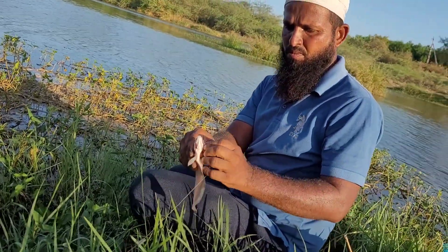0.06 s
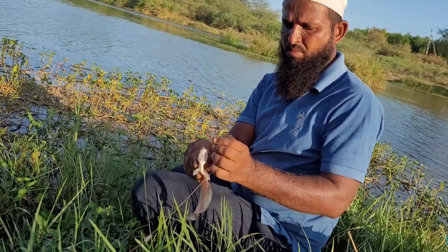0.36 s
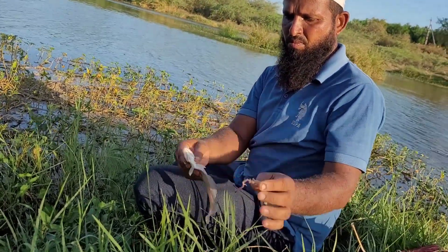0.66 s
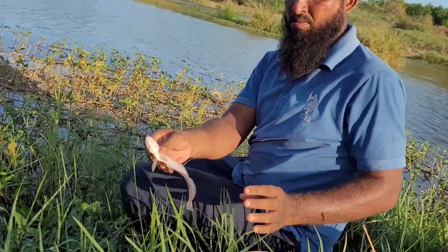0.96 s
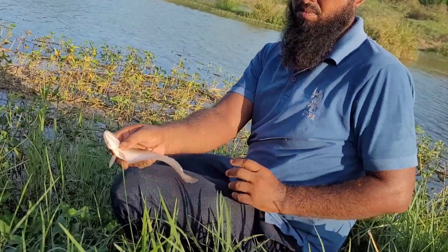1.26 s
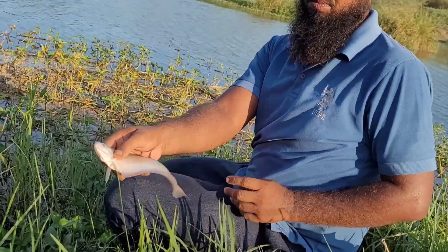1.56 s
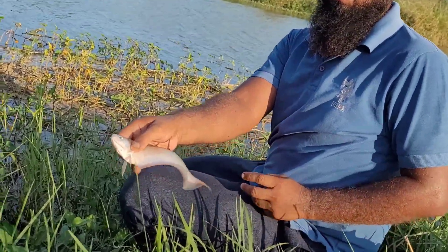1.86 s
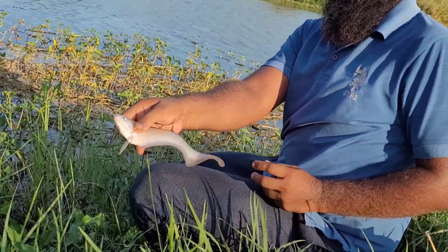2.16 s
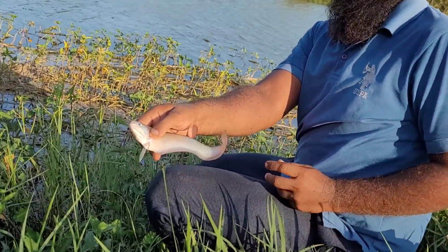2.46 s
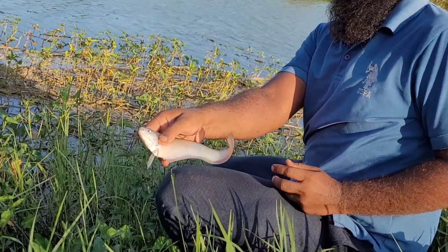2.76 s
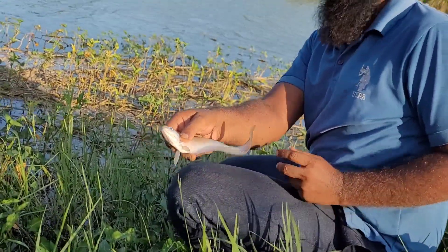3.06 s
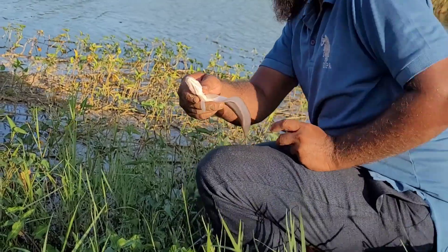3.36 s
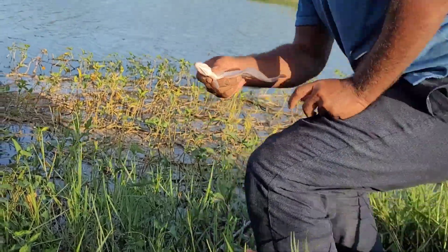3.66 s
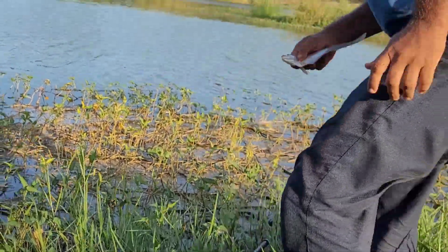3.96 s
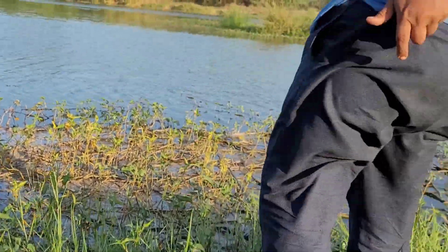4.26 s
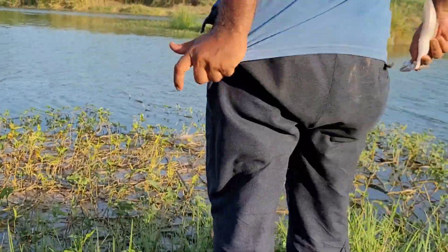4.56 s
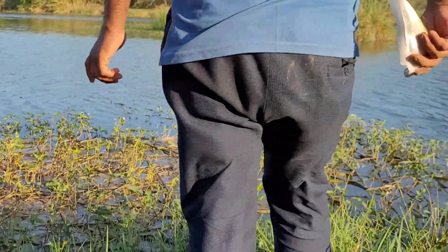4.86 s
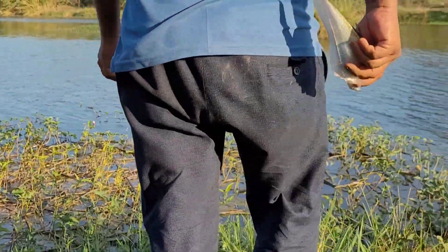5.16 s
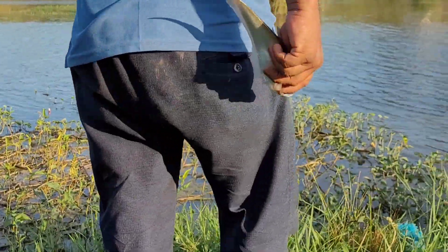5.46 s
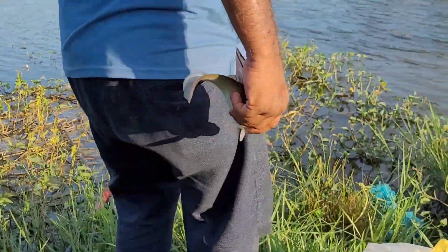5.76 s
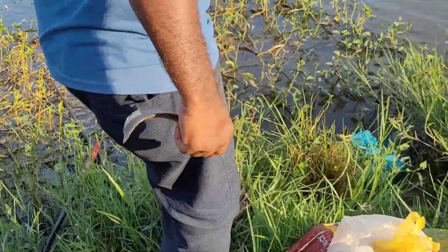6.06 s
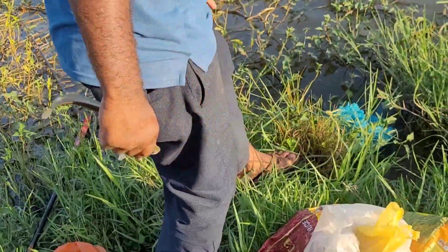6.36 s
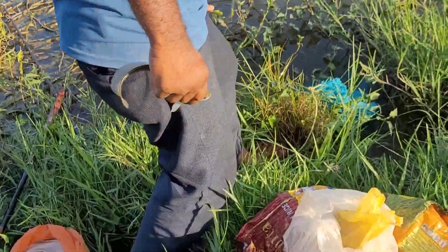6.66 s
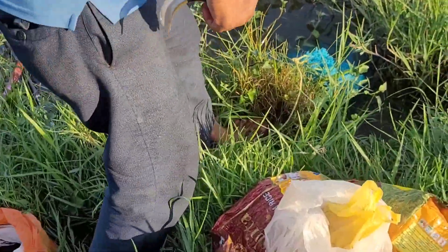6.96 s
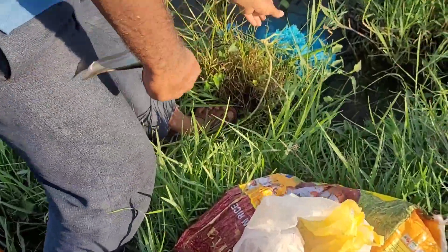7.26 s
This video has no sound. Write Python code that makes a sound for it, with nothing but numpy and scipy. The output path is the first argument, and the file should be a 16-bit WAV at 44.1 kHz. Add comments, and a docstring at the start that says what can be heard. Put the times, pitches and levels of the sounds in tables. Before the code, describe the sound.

By a quiet pond, a cricket, small birds and a repeated wavy whistle give way to grassy footsteps, snapping stems and wind on the microphone.

```python
"""A quiet pond bank, on a hand-held stereo microphone. From the start a bush cricket chirps further off,
thin ticks sound close by, and fingers bump and rub the right port. Small birds join in, off to the right.
Near 2 s and 3.5 s a bird whistles one wavy note that echoes off the banks. As it whistles a third time,
just before 6 s, someone gets up and wades through long grass, stems snapping underfoot,
while a breeze buffets the microphone."""
import sys
import numpy as np
from scipy import signal
from scipy.fft import rfft, irfft, next_fast_len
from scipy.io import wavfile
from scipy.ndimage import uniform_filter1d

SR = 44100
rng = np.random.default_rng(int(sys.argv[2]) if len(sys.argv) > 2 else 0)


def transcribe(u):
    """Save the signal u as a 16-bit wav file named by the first command-line argument.

    u: samples, shape (n,) or (channels, n), limited to [-1, 1]; the rate is SR.
    q: integer samples, one column per channel.
    """
    v = np.clip(np.atleast_2d(u).T, -1, 1)
    q = np.round(v * 32767).astype(np.int16)
    wavfile.write(sys.argv[1], SR, q)


N = 322665
TIME = np.arange(N) / SR
CUTOFF_HZ = 15850


def from_db(db):
    """Decibels to gain."""
    return 10 ** (np.asarray(db) / 20)


def rms_one(x):
    """Scale to rms 1."""
    return x / np.sqrt(np.mean(x ** 2) + 1e-20)


def in_time(rows):
    """The columns of a curve at every sample."""
    s, *columns = np.transpose(rows)
    return [np.interp(TIME, s, c) for c in columns]


def butter(x, hz, kind, order=2):
    """Butterworth filter."""
    sos = signal.butter(order, np.clip(hz, 10, .45 * SR), kind, fs=SR, output="sos")
    return signal.sosfilt(sos, x + 1e-18)


def pan(db):
    """Gains that put the left channel db above the right."""
    return from_db(np.array([[db], [-db]]) / 2)


def drift(rate_hz):
    """A smooth random wander with spread 1."""
    step, settle = 40, 2000
    pole = np.exp(-2 * np.pi * step * rate_hz / SR)
    kicks = rng.standard_normal(N // step + settle + 2)
    slow = signal.lfilter([1], [1, -2 * pole, pole * pole], kicks)[settle:]
    return np.interp(np.arange(N) / step, np.arange(len(slow)), rms_one(slow))


def colour(x, spectrum):
    """Give a steady sound a spectrum that falls away beyond its ends; rms 1."""
    size = next_fast_len(N)
    hz = np.maximum(np.arange(size // 2 + 1) * SR / size, 1)
    points, db = np.transpose(spectrum)
    skirts = np.minimum(1, np.minimum(hz / points[0], points[-1] / hz)) ** 4
    gain = from_db(np.interp(np.log(hz), np.log(points), db)) * skirts * (hz < CUTOFF_HZ)
    return rms_one(irfft(rfft(x, size) * gain, size)[..., :N])


def noise():
    """White noise, unrelated in the two channels."""
    return rng.standard_normal((2, N))


def grains(per_s, spread_db):
    """Random tiny contacts of uneven size; rms 1."""
    sizes = from_db(spread_db * np.minimum(rng.exponential(1, N), 4)) * rng.choice([-1, 1], N)
    return rms_one(sizes * (rng.random(N) < per_s / SR))


def friction(per_s, spread_db, hiss):
    """Blades catching on each other over an even hiss, in both channels."""
    return np.array([grains(per_s, spread_db) for channel in range(2)]) + hiss * noise()


def slur(length, start_hz, middle_hz, end_hz):
    """One thin note that bends through three pitches."""
    u = np.linspace(0, 1, int(length * SR))
    hz = np.polyval(np.polyfit([0, .5, 1], [start_hz, middle_hz, end_hz], 2), u)
    return np.sqrt(np.abs(np.sin(np.pi * u))) * np.sin(2 * np.pi * np.cumsum(hz) / SR)


def ring(t, hz, t60):
    """A struck mode dying away."""
    return np.sin(2 * np.pi * hz * t) * from_db(-60 * t / t60)


def swell(s, attack, fade):
    """A stroke gathers force over its attack, then loses 20 dB in each fade time."""
    rise = np.clip((TIME - s) / attack, 0, 1) ** 2
    return rise * from_db(-20 * np.clip((TIME - s - attack) / fade, 0, 10))


def gate(start, end):
    """1 from start to end, with soft edges."""
    return uniform_filter1d(1. * ((TIME >= start) & (TIME <= end)), size=300)


def add(out, s, sound):
    """Mix a short sound in at time s."""
    i = max(0, int(s * SR))
    out[..., i:i + sound.shape[-1]] += sound[..., :N - i]


# The far background at each port, and the high sizzle over it.
# Each row: frequency in Hz, relative density in dB.
AIR_LEFT = [(120, 6), (300, 2), (600, -6.5), (1200, -10.5), (2200, -9), (3200, -11), (5000, -26),
            (7000, -10.5), (10500, 0.5), (12000, -9), (15000, 0)]
AIR_RIGHT = [(120, -5.5), (300, 4), (600, -4), (1200, -10.5), (2200, -9), (3100, 4.5), (4400, 5),
             (5500, -5), (7500, -13.5), (9500, -4.5), (10800, 3.5), (12000, -5.5), (15000, -3.5)]
SIZZLE_COLOUR = [(8000, -62), (11000, -10.5), (13000, -12.5), (15000, -3), (15800, -8)]
# The sizzle's rise and fall. Each row: time in seconds, level in dB.
SIZZLE_LEVEL = [(0, -92), (.4, -91), (.6, -72), (1.0, -79), (2.1, -72.5), (3.05, -68.5), (3.15, -74),
                (4.0, -75.5), (5.05, -67), (5.9, -69)]


def air():
    """Distant chorus and steady hiss, with a swelling sizzle on top."""
    left, right = noise()
    steady = np.array([from_db(-72.5) * colour(left, AIR_LEFT), from_db(-68) * colour(right, AIR_RIGHT)])
    sizzle_db, = in_time(SIZZLE_LEVEL)
    return steady + from_db(sizzle_db + 1.7 * drift(25)) * colour(noise(), SIZZLE_COLOUR) * pan(-2)


# A bush cricket further off, near the centre.
# Each row: start and end in seconds, pitch in Hz, relative level in dB.
CRICKET_BOUTS = [(.15, 0.847, 9030, -76), (0.854, 1.585, 9170, -68.5), (1.58, 2.74, 8450, -79),
                 (2.747, 4.402, 8740, -76.5), (4.4, 5.453, 9220, -69.5)]


def cricket():
    """About ten chirps a second, each a run of wing strokes on a narrow resonance."""
    hz, = in_time([(s, pitch) for start, end, pitch, _ in CRICKET_BOUTS for s in (start, end)])
    level = sum(from_db(db) * gate(start, end) for start, end, _, db in CRICKET_BOUTS)
    chirps = np.clip(1.1 + 1.4 * np.cos(2 * np.pi * 10.4 * (TIME - 1.25)), 0, 1)
    strokes_per_s = 105 * (1 + 0.066 * drift(6.1))
    stroke = np.cumsum(strokes_per_s) / SR % 1
    sweep_hz = 900 * (.5 - stroke) + 220 * drift(400)   # the pitch falls within each stroke
    wing = np.sin(np.pi * stroke) ** 2 * np.sin(2 * np.pi * np.cumsum(hz + sweep_hz) / SR)
    return level * from_db(-10) * rms_one(chirps * wing) * pan(-0.93)


# Echoes off the pond's banks. Each row: delay in seconds, level in dB against the direct sound.
BANK_ECHOES = [(0.032, -21.5), (.057, -16), (0.132, -25)]


def banks(x, scatter_db, t60):
    """A few echoes and a faint scatter from the reeds, different at each port."""
    t = TIME[:SR // 2]
    scatter = rng.standard_normal((2, len(t))) * from_db(-60 * t / t60)
    response = from_db(scatter_db) * rms_one(scatter) / np.sqrt(len(t))
    for delay, db in BANK_ECHOES:
        for side in response:
            add(side, delay + rng.uniform(0, 0.0038), from_db([db]))
    return signal.fftconvolve(x[None], response, axes=1)[:, :N]


# Small birds further off, well to the right: first their rising slurs.
# Each row: start and length in seconds, starting pitch in Hz, relative level in dB.
RISING_SLURS = [(1.05, 0.21, 3070, -72.5), (1.58, 0.13, 4160, -72), (1.98, 0.17, 3080, -71),
                (2.541, .1, 4290, -74), (3.413, 0.072, 4360, -70.5), (4.403, .082, 4570, -77),
                (6.04, 0.13, 3360, -63.5)]
# High falling slurs. Each row: start and length in seconds, middle and end in Hz, relative level in dB.
FALLING_SLURS = [(2.565, 0.27, 6980, 5200, -69), (3.473, 0.18, 6050, 5070, -76),
                 (3.718, 0.073, 6800, 6300, -74), (5.16, 0.18, 6300, 4850, -69)]
# Short pips. Each row: start in seconds, first and last pitch in Hz, relative level in dB.
PIPS = [(1.62, 4000, 2900, -66), (2.054, 4560, 4450, -68), (2.109, 5200, 4140, -67),
        (2.311, 3690, 3750, -68), (2.352, 4500, 4320, -68), (2.406, 4900, 3670, -68),
        (5.439, 4300, 5300, -65)]


def small_birds():
    """Slurs and pips over a far twitter; the long path to the microphone makes them waver."""
    rise_hz_per_s, fall_start_hz, pip_s = 9100, 7630, .023
    song = np.zeros(N)
    for s, length, hz, db in RISING_SLURS:
        add(song, s, from_db(db) * slur(length, *np.linspace(hz, hz + rise_hz_per_s * length, 3)))
    for s, length, middle_hz, end_hz, db in FALLING_SLURS:
        add(song, s, from_db(db) * slur(length, fall_start_hz, middle_hz, end_hz))
    for s, start_hz, end_hz, db in PIPS:
        add(song, s, from_db(db) * slur(pip_s, start_hz, (start_hz + end_hz) / 2, end_hz))
    for when, span, pitch, bend, loud in rng.random((70, 5)):
        hz, glide = 3100 + 1500 * pitch, 900 * (bend - .5)
        twitter = slur(0.0048 + 0.042 * span, hz - glide, hz, hz + glide)
        add(song, when * N / SR, from_db(-84 + 10 * loud) * twitter)
    waver_s, waver_db = 3.5e-5 * drift(70), 4.5 * drift(60)
    song = np.interp(TIME + waver_s, TIME, song) * from_db(waver_db)
    return from_db(-5.5) * (song + banks(song, scatter_db=-8.5, t60=0.46)) * pan(-19)


# Thin dry ticks close by on the right.
# Each row: time in seconds, relative levels of the tick and of its sizzle in dB.
TICKS = [(.216, -51, -74), (1.279, -53, -73.5), (1.517, -48.5, -77), (1.996, -48.5, -66.5),
         (2.423, -45, -67.5), (2.883, -46.5, -66.5), (3.546, -48, -67), (3.948, -50.5, -66.5),
         (4.322, -52, -67), (4.634, -53, -75), (4.872, -49, -77)]


def ticks():
    """A fine sizzle builds and ends in a tiny, very bright tick."""
    lead_s, rise_s = 0.29, 0.15
    out, lead_in, t = np.zeros((2, N)), np.zeros(N), TIME[:SR // 25]
    burst = (1 - np.exp(-t / .0012)) * np.exp(-t / .005)
    for s, db, sizzle_db in TICKS:
        add(out, s, from_db(db) * rng.standard_normal((2, len(t))) * burst / burst.max())
        lead_in += from_db(sizzle_db) * np.clip((TIME - s + lead_s) / rise_s, 0, 1) * (TIME < s)
    sizzle = lead_in * colour(noise(), SIZZLE_COLOUR)
    return butter(out, 12400, "high", order=4) * pan(-10.5) + sizzle * pan(-5.5)


# The breeze, right on the ports. Each row: time in seconds, relative level in dB.
GUSTS = [(5.6, -72.5), (5.82, -50.5), (6.0, -46), (6.12, -50.5), (6.22, -43.5), (6.5, -38), (6.58, -49.5),
         (6.87, -52), (6.93, -43.5), (7.32, -44)]
# Its low buffeting. Each row: frequency in Hz, relative density in dB.
BUFFET_COLOUR = [(30, -16.5), (45, 0), (62, 2.5), (85, -1), (110, -5.5), (150, -13), (190, -25), (260, -23),
                 (380, -38.5), (520, -45)]


def breeze():
    """Gusts make turbulence, separate at each port."""
    gust_db, = in_time(GUSTS)
    eddies = colour(noise(), BUFFET_COLOUR)
    # Even out the eddies so that the gust sets their force.
    eddies /= np.sqrt(uniform_filter1d(np.mean(eddies ** 2, axis=0), size=SR // 12))
    flutter_db = 3.14 * drift(17)
    return from_db(gust_db + 5 + flutter_db) * gate(GUSTS[0][0], N / SR) * eddies * pan(2.3)


# Fingers bumping the right port.
# Each row: time in seconds, thud peak in dB, contact in seconds, grit in dB against the thud.
BUMPS = [(0.538, -47.5, 0.0028, -27), (0.574, -48, 0.0032, -25), (.649, -47, 0.0016, 7.5),
         (1.127, -39.5, 0.0043, -20), (1.23, -37, 0.0032, -12), (1.576, -35, 0.0055, -3.5),
         (1.691, -40.5, 0.00091, 3), (1.692, -26, 0.0029, -20), (3.661, -28.5, 0.00081, -26),
         (3.6654, -26.5, 0.00072, 9), (3.668, -20.5, 0.0016, -2), (3.67, -23, 0.0019, -19),
         (3.982, -51, 0.0015, -1), (4.19, -53.5, 0.002, -22)]
# A finger sliding over that port.
# Each row: start in seconds, level in dB, attack and fade in seconds, slips a second, sharpness 0-1.
RUBS = [(0.131, -48, 0.12, 0.11, 3500, 0.21), (3.616, -31.5, 0.044, 0.026, 1300, 0.51)]


def fingers():
    """Bumps push a pressure pulse into the port, which leaks away; sliding adds stick-slip crackle."""
    out, t = np.zeros(N), TIME[:SR // 8]
    for s, db, contact, grit_db in BUMPS:
        push = np.sin(np.pi * np.minimum(t / contact, 1)) ** 2
        thud = butter(push, 83, "high", order=3)
        grit = butter(rng.standard_normal(len(t)) * np.exp(-t / 0.0037), 1420, "low", order=1)
        add(out, s, from_db(db) * (thud / np.max(np.abs(thud)) + from_db(grit_db) * grit))
    for s, db, attack, fade, per_s, sharpness in RUBS:
        slips = grains(per_s, spread_db=-0.5) + 0.16 * rng.standard_normal(N)
        dull, sharp = rms_one(butter(slips, 940, "low")), rms_one(butter(slips, 6100, "low", order=1))
        rub = butter((1 - sharpness) * dull + sharpness * sharp, 93, "high")
        out += from_db(db) * swell(s, attack, fade) * rub
    return out * from_db([[-32], [0]])


# Soft rumble of the microphone in the hand. Each row: time in seconds, relative level in dB.
RUMBLE_LEVEL = [(0, -70.5), (.33, -52.5), (.45, -62.5), (.82, -58.5), (1.08, -64.5), (1.85, -62.5),
                (2.35, -69.5), (2.59, -62), (2.8, -70.5), (3.75, -67.5), (4.55, -75), (5.6, -68.5)]
# Its spectrum. Each row: frequency in Hz, relative density in dB.
RUMBLE_COLOUR = [(30, -26), (40, 5), (48, 7), (62, -1), (90, -4.5), (125, -6), (170, -18), (260, -18)]


def handling_rumble():
    """The held microphone rumbles throughout, stirred by every finger bump."""
    rumble_db, = in_time(RUMBLE_LEVEL)
    held = from_db(rumble_db + 2.5 + 1.6 * drift(8)) * pan(-7)
    trembles = [from_db(db - 27.5) * swell(s, contact, fade=0.073) for s, db, contact, _ in BUMPS]
    return (held + np.max(trembles, axis=0) * pan(-23)) * colour(noise(), RUMBLE_COLOUR)


# Cloth on the grass as the body shifts and rises. Each row: time in seconds, level in dB.
BRUSH_LEVEL = [(0, -83), (.45, -81), (.58, -68.5), (.89, -70), (1.0, -86.5), (3.9, -80.5), (4.12, -70.5),
               (5.05, -69.5), (5.8, -64.5), (6.0, -69.5)]
# Spectra of the cloth and of an arm's sweep. Each row: frequency in Hz, relative density in dB.
BRUSH_COLOUR = [(500, -3), (1900, -7.5), (2500, -4), (3000, 2.5), (4200, 0), (6500, -1.5), (10000, -3.5),
                (15000, 2.5)]
SWEEP_COLOUR = [(1700, -21), (2200, -10), (2700, 5), (3150, 6), (4000, -0.5), (5200, -2), (7000, -10.5),
                (11000, -2), (15000, -1)]


def brushing():
    """Right of centre, cloth drags over the blades and an arm sweeps through them once."""
    brush_db, = in_time(BRUSH_LEVEL)
    cloth = colour(friction(2500, spread_db=4.5, hiss=0.97), BRUSH_COLOUR)
    cloth *= from_db(brush_db + 3.4 * drift(20))
    arm = colour(friction(3000, spread_db=6, hiss=0.79), SWEEP_COLOUR)
    arm *= from_db(-51.5) * swell(0.741, attack=0.067, fade=0.1)
    return cloth * pan(-3.5) + arm * pan(-7)


# Strides through the long grass, near the centre.
# Each row: start in seconds, relative levels of swish and crush in dB, fade in seconds.
STRIDES = [(5.916, -59.5, -66, 0.39), (6.13, -59, -62.5, 0.54), (6.27, -60.5, -72.5, 1.3),
           (6.478, -58, -49.5, 0.19), (6.589, -52, -52, 0.31), (6.68, -50.5, -53.5, 0.27),
           (6.88, -59, -60.5, 0.87)]
# Spectra of the swish and the crush. Each row: frequency in Hz, relative density in dB.
SWISH_COLOUR = [(1500, -5.5), (2400, -13), (2900, 1), (3500, 0.5), (5000, 2), (7000, -2.5), (9000, -5),
                (12500, 1.5), (15500, 1.5)]
CRUSH_COLOUR = [(250, -1.5), (450, -3), (600, -3.5), (800, -3), (1080, -2.5), (1350, -3), (1780, -1),
                (2050, -5.5), (2500, -3), (2850, 0), (3300, -16.5), (6000, -11.5), (12000, -37)]


def wading():
    """Legs swish through the blades and feet crush them; overlapping strides add in power."""
    swish_power, crush_power = np.zeros((2, N))
    for s, swish_db, crush_db, fade in STRIDES:
        stride = swell(s, attack=0.087, fade=fade)
        swish_power += (from_db(swish_db) * stride) ** 2
        crush_power += (from_db(crush_db) * stride) ** 2
    swish = colour(friction(5000, spread_db=3.5, hiss=0.88), SWISH_COLOUR)
    swish *= np.sqrt(swish_power) * from_db(6.5 + 1.7 * drift(17))
    crush = colour(friction(2000, spread_db=5, hiss=1), CRUSH_COLOUR)
    crush *= np.sqrt(crush_power) * from_db(2 + 2 * drift(40))
    return swish * pan(0.12) + crush * pan(-1.5)


# Stems snapping on both sides of the microphone. Each row: time in seconds, peak in dB,
# the stem's own pitch in Hz, shared modes in dB against that pitch, left over right in dB.
SNAPS = [(.139, -54.5, 2070, -28, -3), (.554, -40.5, 3940, -48, -11), (.807, -50, 3430, -30, 7),
         (3.421, -45.5, 2900, -19, -3), (3.925, -50.5, 2850, 0, -3), (5.615, -37.5, 3050, -16.5, 7),
         (6.473, -44, 2800, 8.5, -6), (6.656, -30, 1780, -17, 3), (6.665, -37, 1500, -1, -9),
         (6.711, -47, 945, 3, 15), (6.7652, -24.5, 2700, 16, -6)]
# Modes that all stems share. Each row: frequency in Hz, relative level in dB, t60 in seconds.
STEM_MODES = [(617, 2, 0.018), (1110, 2, 0.013), (1660, 5.5, 0.0049), (2800, 4, 0.01), (5300, 8, 0.0032)]


def stems():
    """Each snap is a short splintering burst that rings the stem; thin stems radiate little bass."""
    out, t = np.zeros((2, N)), TIME[:SR // 20]
    shared = sum(from_db(db) * ring(t, hz, t60) for hz, db, t60 in STEM_MODES)
    splinter_decay = np.exp(-t / 0.00081) + 0.15 * np.exp(-t / 0.02)
    for s, db, pitch_hz, shared_db, side_db in SNAPS:
        modes = ring(t, pitch_hz, t60=22 / pitch_hz) + from_db(shared_db) * shared
        burst = (t == 0) + 0.19 * rng.standard_normal((2, len(t))) * splinter_decay
        snap = signal.fftconvolve(burst, modes[None], axes=1)[:, :len(t)]
        snap = butter(snap, [.25 * pitch_hz, 2.2 * pitch_hz], "band")
        add(out, s, from_db(db) * snap / np.max(np.abs(snap)) * pan(side_db))
    return out


# The wavy note of the nearer bird, a little to the right.
# Each row: seconds from the top of the arch, pitch in Hz, relative level in dB.
WAVY_NOTE = [(-.29, 1363, -78), (-.25, 1300, -68.5), (-.19, 1235, -68), (-.14, 1220, -69),
             (-.085, 1295, -62.5), (-.03, 1405, -56.5), (.005, 1441, -57), (0.053, 1329, -61),
             (.12, 1084, -63), (.2, 824, -82)]
# Its three whistles. Each row: top of the arch in seconds, pitch ratio, gain in dB,
# factors for the depth of the dip and the pace of the fall.
WHISTLES = [(1.873, .992, -6.5, 1.1, 1.04), (3.482, 1.008, -2.5, 0.88, .98), (5.755, 1.0, -1, 0.86, 1.02)]


def whistler():
    """A bird's pure tone dips, arches and falls, three times alike; it reaches the right port first."""
    notch_hz, notch_width_hz, notch_db = 1193, 60, -8   # the ground reflection partly cancels this pitch
    song, arch_hz = np.zeros(N), max(hz for _, hz, _ in WAVY_NOTE)
    for top, ratio, gain_db, depth, pace in WHISTLES:
        dip = [(top + s, arch_hz - depth * (arch_hz - hz), db) for s, hz, db in WAVY_NOTE if s < 0]
        fall = [(top + s / pace, hz, db) for s, hz, db in WAVY_NOTE if s >= 0]
        hz, db = in_time(dip + fall)
        hz = ratio * uniform_filter1d(hz, size=1100) * (1 + .005 * drift(55))
        ground_db = notch_db * np.exp(-((hz - notch_hz) / notch_width_hz) ** 2)
        level = from_db(db + gain_db + ground_db + 3 * drift(40)) * gate(dip[0][0], fall[-1][0])
        song += level * np.sqrt(2) * np.sin(2 * np.pi * np.cumsum(hz) / SR)
    direct = np.array([np.interp(TIME - .00026, TIME, song), song])
    return from_db(-1) * (direct + banks(song, scatter_db=-12, t60=1)) * pan(-4.5)


def scene():
    """Everything that reaches the microphone on the bank."""
    far = air() + cricket() + small_birds()
    close = ticks() + breeze() + fingers() + handling_rumble() + brushing() + wading() + stems()
    return far + close + whistler()


def record(dry):
    """The recorder cuts the top treble steeply."""
    return signal.sosfilt(signal.ellip(12, .1, 80, CUTOFF_HZ, fs=SR, output="sos"), dry)


dry = scene()
out = record(dry)
transcribe(out)
```